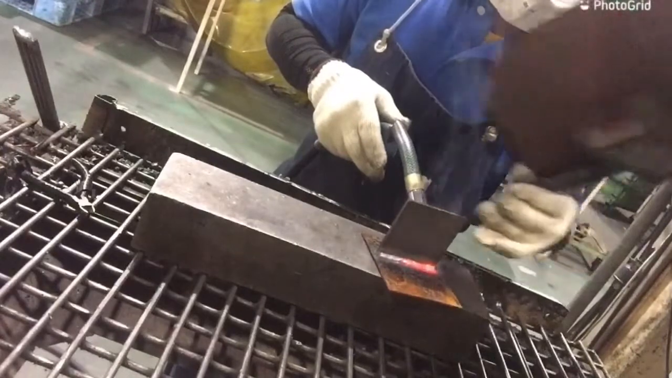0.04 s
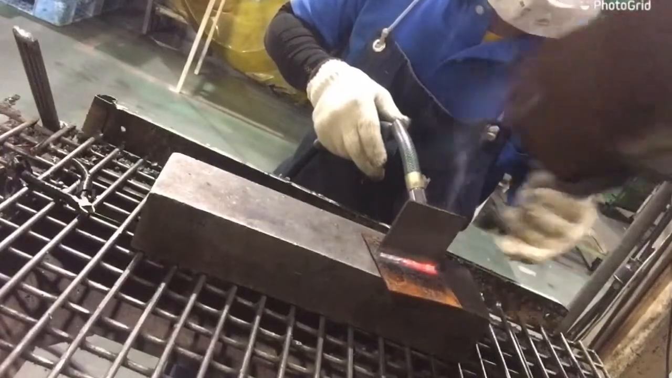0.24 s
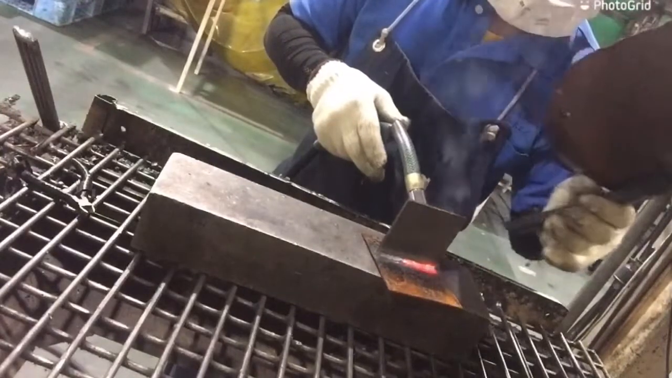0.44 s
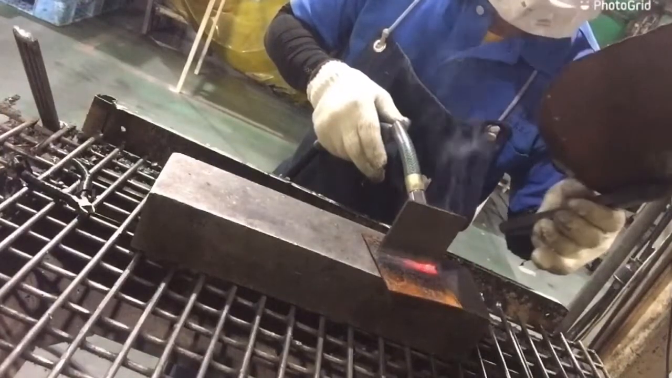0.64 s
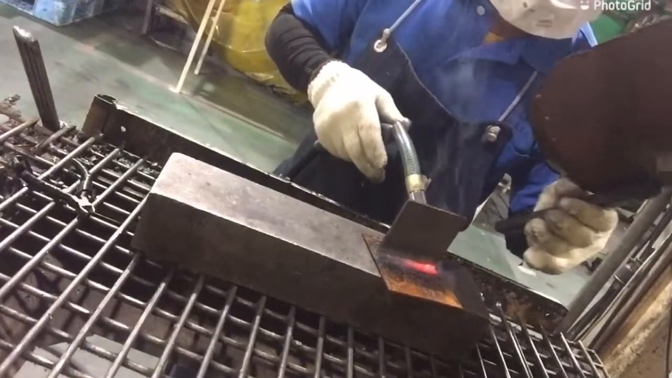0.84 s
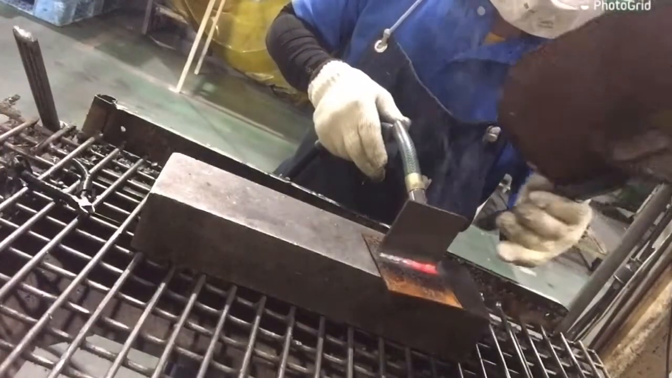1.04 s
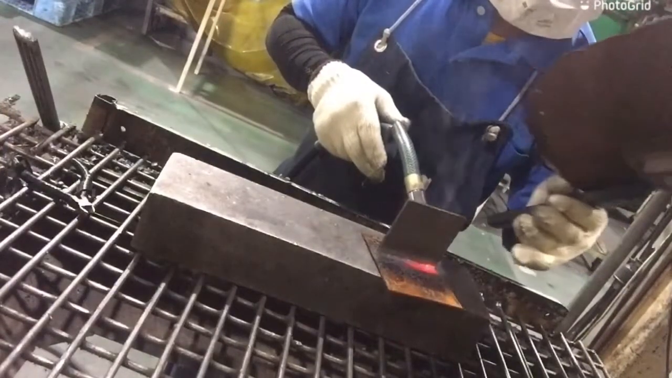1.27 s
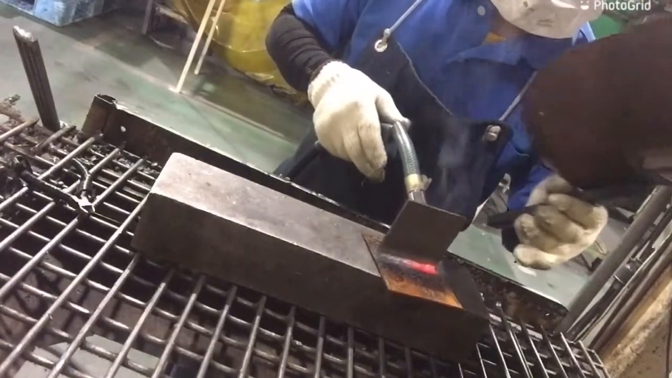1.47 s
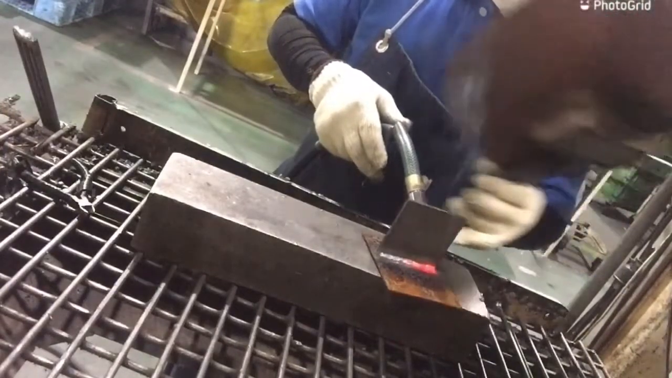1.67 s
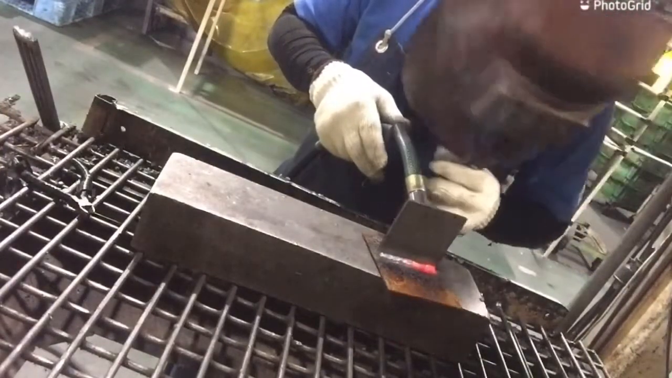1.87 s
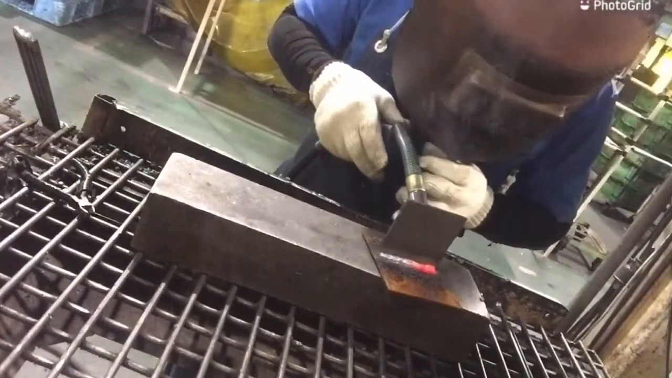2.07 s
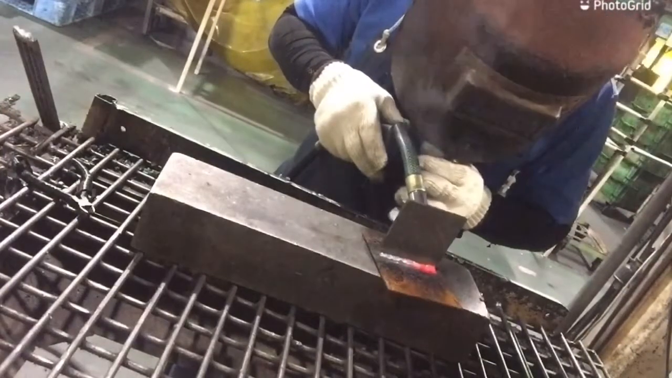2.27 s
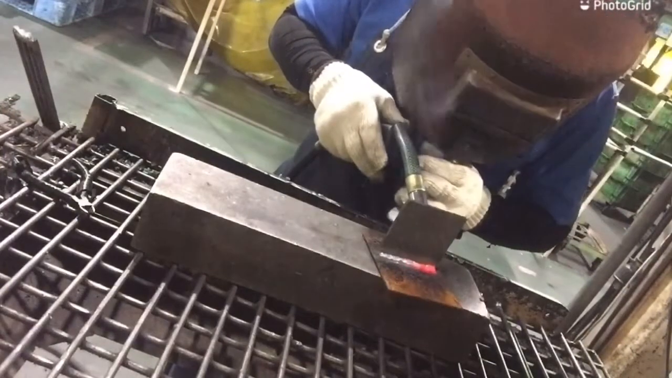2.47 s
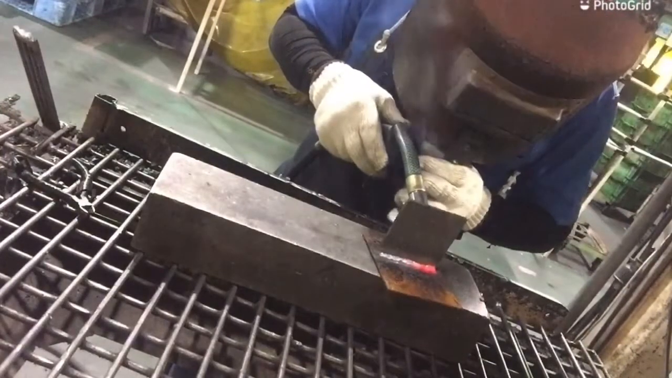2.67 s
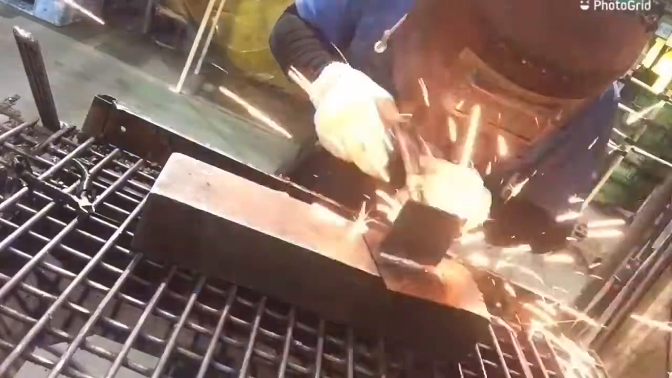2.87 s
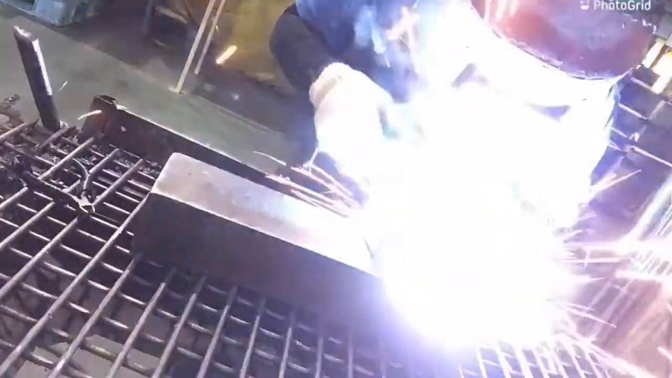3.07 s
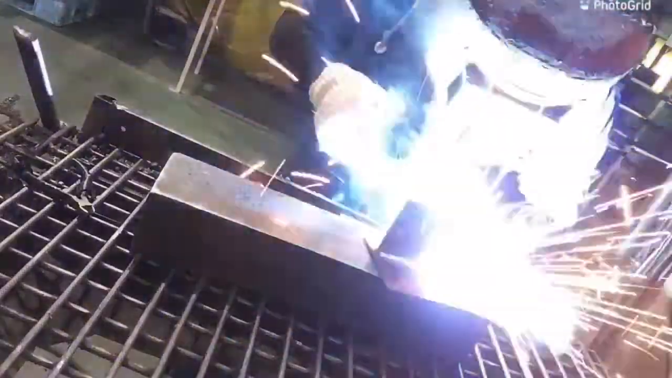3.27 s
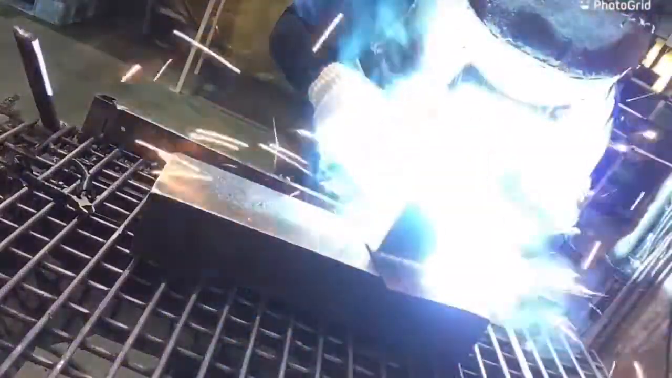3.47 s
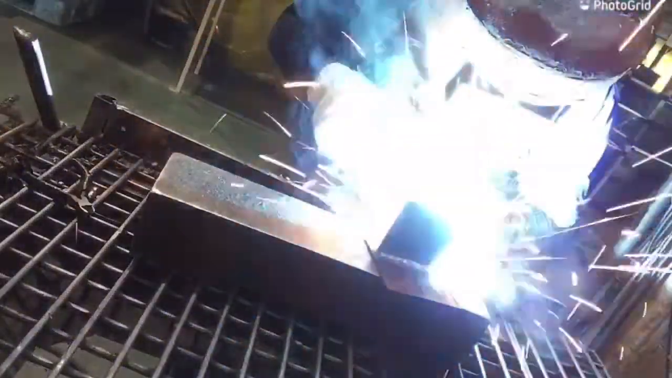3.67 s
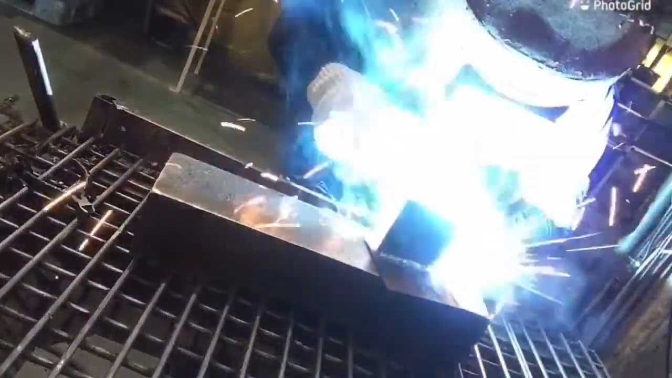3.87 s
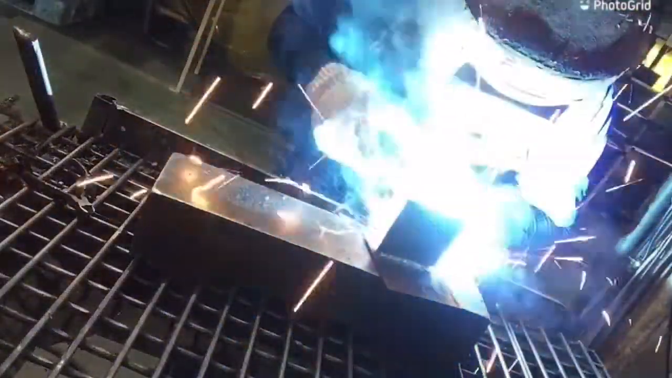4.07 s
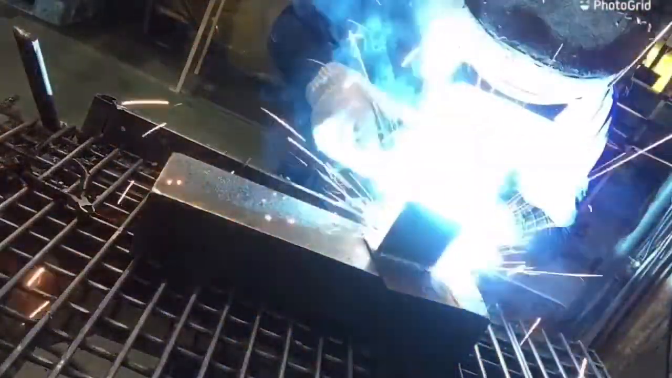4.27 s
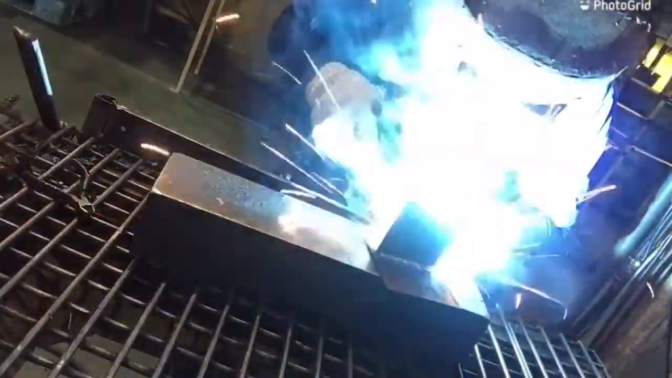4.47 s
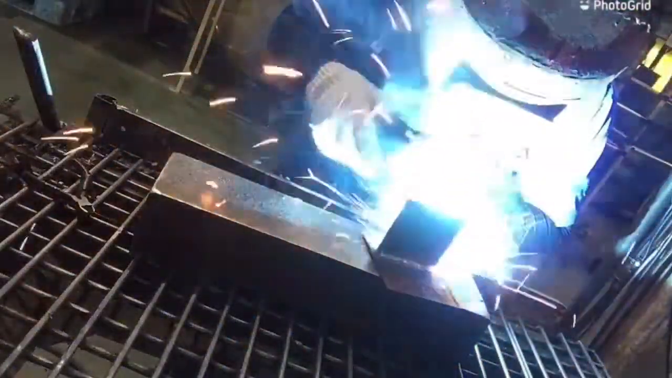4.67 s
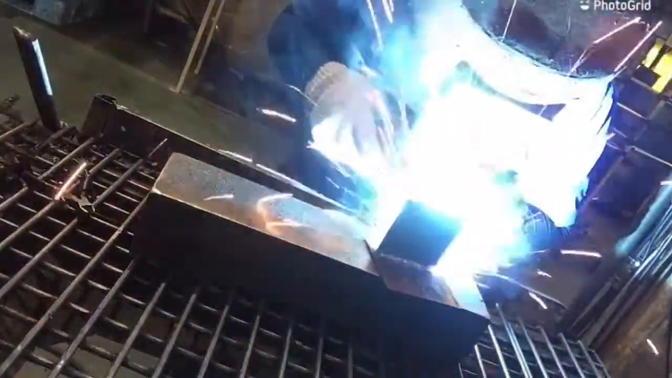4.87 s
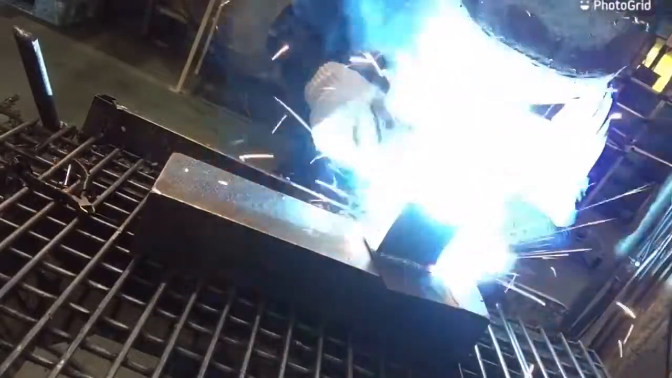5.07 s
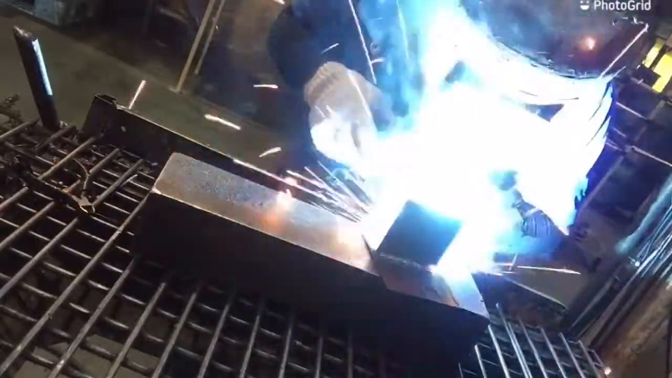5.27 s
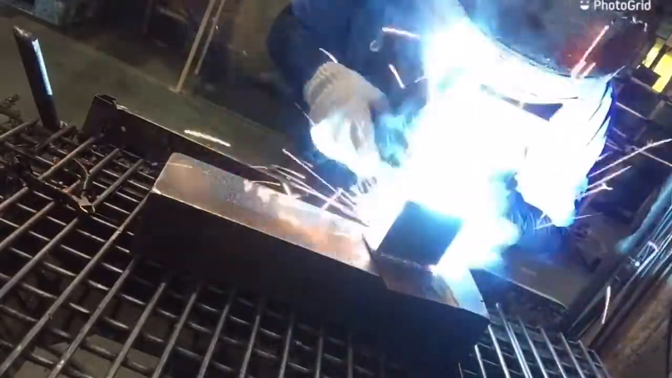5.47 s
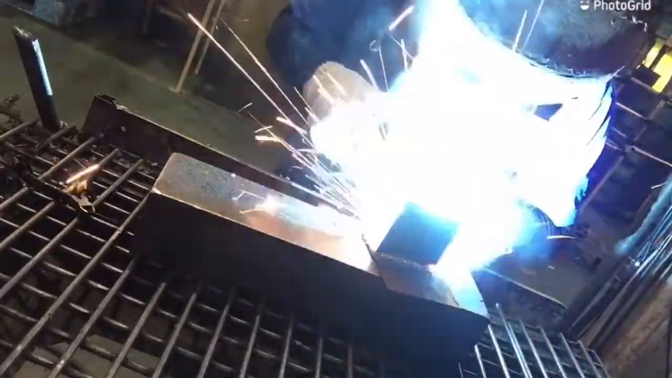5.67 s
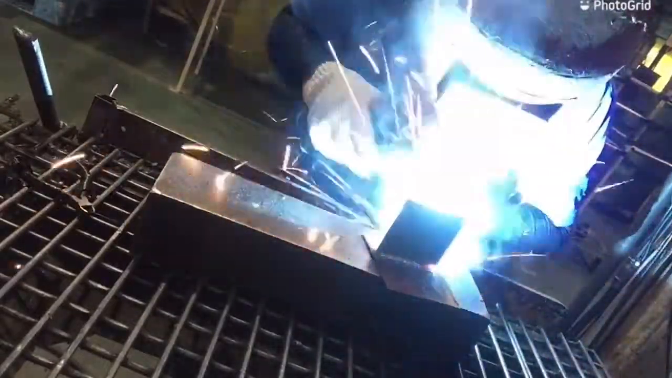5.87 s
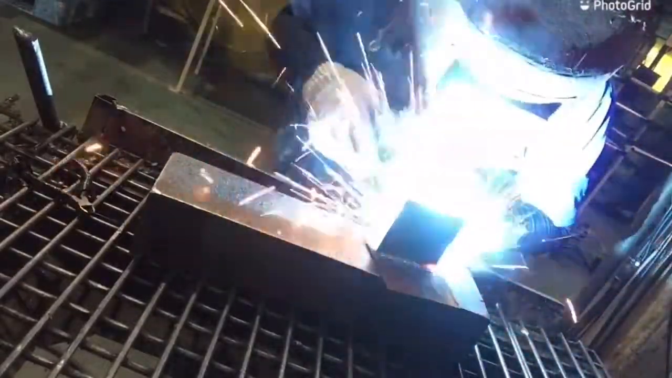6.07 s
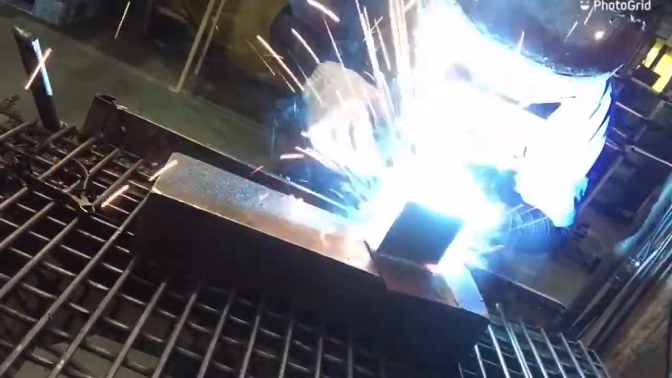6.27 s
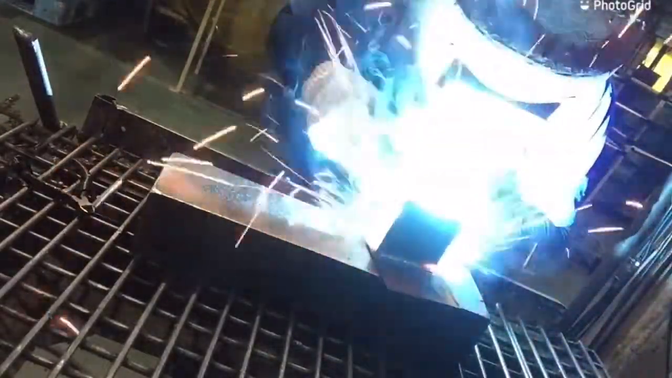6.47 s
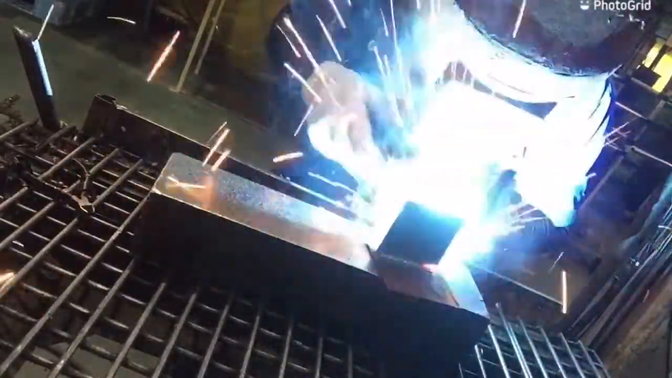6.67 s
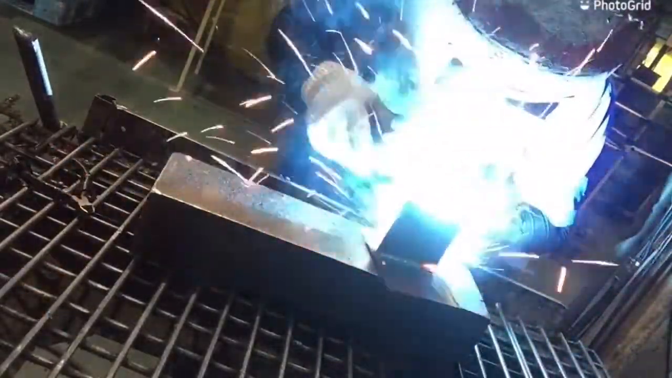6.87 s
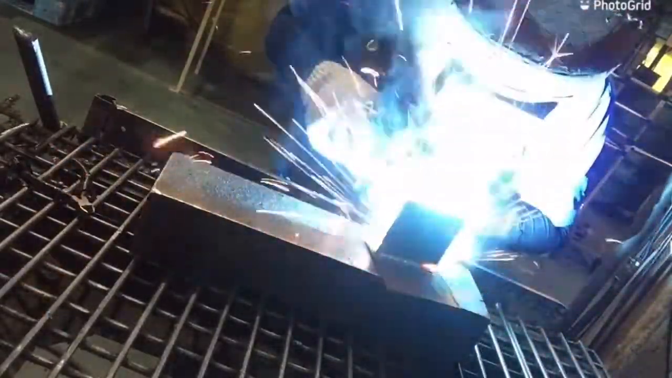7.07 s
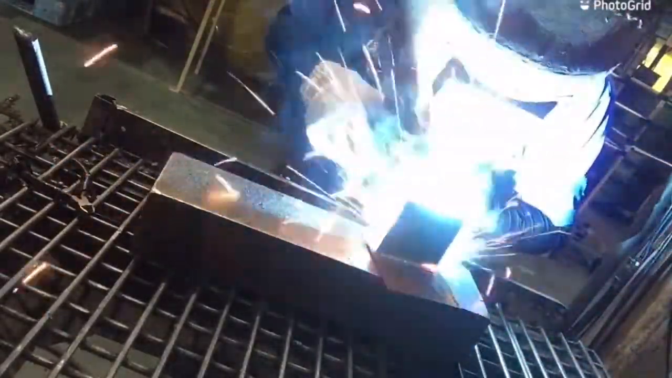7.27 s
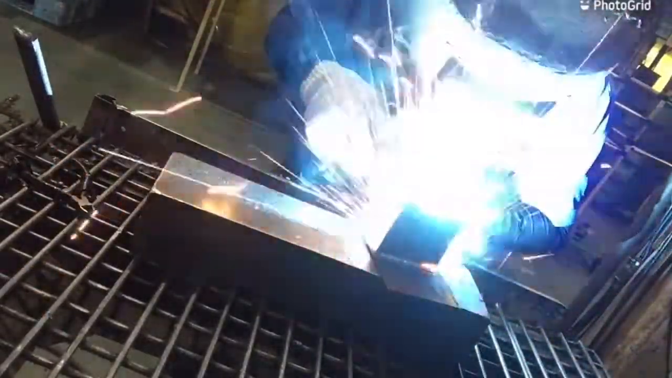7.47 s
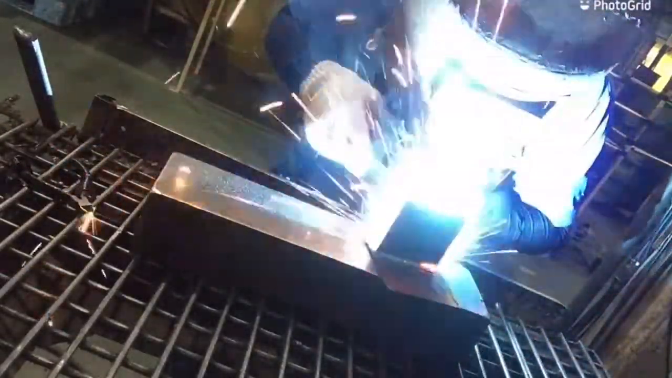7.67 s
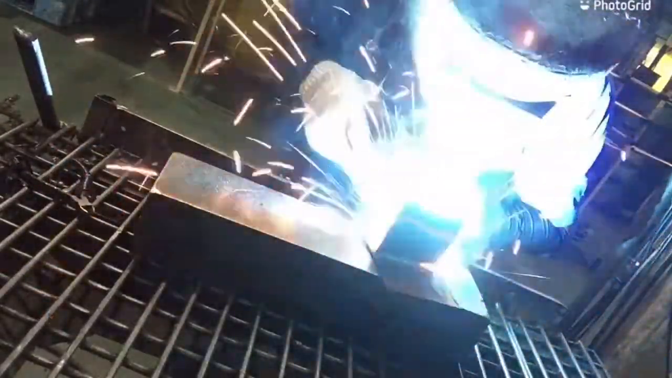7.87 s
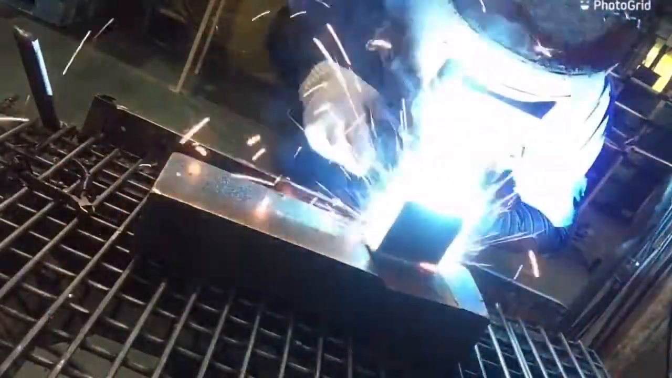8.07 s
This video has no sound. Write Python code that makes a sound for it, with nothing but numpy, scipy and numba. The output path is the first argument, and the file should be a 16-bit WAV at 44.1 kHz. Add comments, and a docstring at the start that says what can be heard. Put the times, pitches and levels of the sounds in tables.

```python
"""Tack welding in a droning workshop

Fans and motor lines drone as filtered noise and wavering sines; a wire scratches thin steel in fizzing bursts.
The arc catches with blasts, falling-pitch thumps that kick the phone's microphone, then settles into a crackle:
the wire dips into the pool roughly 55 to 115 times a second, even when slow, ragged when fast, and at times sticks.
Each re-ignition is an impulse with a spray of noise, ringing the space between plate, torch and mask."""
import sys
import numpy as np
from scipy import signal
from scipy.fft import rfft, irfft, next_fast_len
from scipy.io import wavfile
from scipy.ndimage import uniform_filter1d
from numba import njit

SR = 44100
rng = np.random.default_rng(int(sys.argv[2]) if len(sys.argv) > 2 else 0)


def persist_wave(psi):
    """Save psi, clipped to +-1, as 16-bit WAV."""
    counts = np.round(np.clip(psi, -1, 1) * 32767).astype(np.int16)
    wavfile.write(sys.argv[1], SR, np.atleast_2d(counts).T)


N = 358533
T = np.arange(N) / SR  # time axis [s]
ARC_START_S, SETTLED_S = 3.0, 3.357  # the arc catches; the wire begins to dip evenly
EVEN_RATE, RAGGED_RATE = 60, 100  # dips a second: slow dipping is even, fast dipping is ragged
ESCAPE_S = 0.011  # time in which a snap escapes from the open-sided nook
TOP_HZ = 15900  # where the phone cuts the top

# Colour of the workshop fans: (frequency [Hz], relative level [dB per Hz])
FAN_COLOUR = [(20, -40), (42, -12.5), (56, -7), (78, -6.5), (110, -5.5), (250, -5.5), (400, -8.5),
              (500, -14.5), (750, -19), (1400, -22), (3600, -25.5), (5000, -29), (6500, -28.5),
              (10400, -38.5), (11500, -36.5), (15500, -41)]
# Resonances of the ventilation ducts: (frequency [Hz], width at -6 dB [Hz], level [dB])
DUCT_MODES = [(161, 16, -39), (200, 23, -38), (323, 110, -37.5), (389, 43, -37.5)]
# Lines of motors and transformer, before they waver and sag: (frequency [Hz], level [dB])
MOTOR_LINES = [(59, -39.5), (108, -38.5), (210, -36.5), (253, -31.5), (377, -37.5), (775, -56)]
# The wire touches and sputters before the arc holds:
# (time [s], relative level [dB], rise [s], decay [s], treble share [gain])
WIRE_SPUTTERS = [(2.72, -17.5, 0.0072, 0.036, 0.053), (2.808, -2.5, 0.00057, 0.0085, 0.086),
                 (2.847, -13.5, 0.0017, 0.025, 0.34), (2.853, -8, .003, 0.0042, 1),
                 (2.9569, -3.5, 0.00036, 0.0078, 0.85), (2.9745, -9.5, 0.00054, .005, 0.96),
                 (2.966, -19, 0.022, 0.065, 0.85)]
# Resonances of the space round the arc at the start, middle and end of the seam:
# (frequency [Hz], width [Hz], relative level [dB])
NOOK_START_MODES = [(1397, 200, 0.5), (2194, 130, -3), (2360, 33, -24.5), (3040, 130, -7.5),
                    (3570, 200, -6.5), (4270, 240, -4), (4800, 140, -23), (5640, 120, 0), (6400, 97, -1.5),
                    (6690, 45, 3), (7890, 43, 0), (9100, 290, -7), (10050, 150, -1), (11200, 200, -6),
                    (11840, 170, 0.5), (12700, 320, -1), (12200, 130, -11), (13280, 82, 6), (14100, 44, -6),
                    (14700, 79, -1)]
NOOK_MIDDLE_MODES = [(1460, 130, -4), (2218, 160, -6.5), (3080, 87, -6), (3622, 85, -4.5), (4256, 49, -2),
                     (4670, 90, -3.5), (5290, 41, -6), (5720, 62, -2.5), (6307, 150, 2), (7100, 27, 0.5),
                     (8650, 130, -2.5), (9200, 76, -12), (9930, 190, -3.5), (11240, 370, -6.5),
                     (11900, 76, -12), (12100, 77, -12), (11900, 99, -3), (13400, 110, -4),
                     (13700, 77, -15), (14700, 49, -32)]
NOOK_END_MODES = [(1456, 145, -3), (2180, 260, -6.5), (2600, 169, -12.5), (3040, 88, -7), (3650, 69, -3.5),
                  (4310, 69, -8), (4690, 190, -4.5), (5750, 65, 0), (6336, 170, 2), (6960, 170, -4.5),
                  (6800, 60, -7), (8560, 170, -1), (9120, 120, -2.5), (9930, 220, -6), (11000, 300, -4),
                  (12040, 140, -2.5), (12200, 70, -15), (12900, 360, -8), (14200, 260, -7)]
# Broad colour of a snap: (frequency [Hz], relative level [dB])
SNAP_TONE = [(60, -20), (250, -9.5), (600, -0.5), (950, 1), (1220, -5.5), (1450, 0.5), (1800, 4.5),
             (2600, 5), (4000, 1), (7500, -1), (11500, 1.5), (13700, -0.5), (16000, 5)]
# The burning arc between snaps: (time [s], relative level [dB])
ARC_LEVEL = [(3.03, -21), (3.14, -26), (3.37, -37), (3.91, -29), (4.11, -24), (4.48, -21), (4.69, -21.5),
             (5.71, -19.5), (6.24, -16.5), (6.48, -26.5), (6.96, -21), (7.11, -20), (7.66, -15.5),
             (7.83, -25), (8.13, -24)]
# Pops that stand out of the crackle: (time [s], relative level [dB])
LOUD_POPS = [(3.0008, -7), (3.0115, -7), (3.0222, -3), (3.0463, -9), (3.0917, -10), (3.1128, -10),
             (3.4265, -12.5), (3.4947, -15), (3.571, -10), (3.6232, -7.5), (3.679, -10.5), (3.74, -12.5),
             (3.9427, -12.5), (4.0319, -12), (4.159, -11), (4.3341, -6), (4.3853, -13), (4.4782, -5),
             (4.4912, -4), (4.67, -7), (4.8492, -7), (4.9859, -5.5), (5.0658, -6), (5.088, -4.5),
             (5.1176, -6), (5.3023, -5), (5.6823, -6.5), (5.7856, -10), (6.14, 0.5), (6.1995, -1),
             (6.2795, -3), (6.4437, -5), (6.6352, -6), (6.6868, -6), (6.7645, -6), (6.8934, -5),
             (6.9817, -5.5), (7.2003, -7), (7.3171, -8), (7.5248, -7), (7.6091, -5.5), (7.7433, -2),
             (7.8444, -9), (7.858, -1), (7.9225, -8.5), (7.9887, -7.5)]
# Blasts of the unsteady young arc: (time [s], relative size [dB])
ARC_BLASTS = [(3.01, -15), (3.024, 4), (3.0365, 5.5), (3.112, -9), (3.1245, 8), (3.1392, 0), (3.187, 10),
              (3.2, -0.5), (3.2127, -6.5), (3.2218, 3.5), (3.2313, -14), (3.2555, 0), (3.268, 5),
              (3.282, -13), (3.296, 3), (3.312, -18), (3.347, -12), (3.495, -3.5)]
# The wire sticks in the pool and the crackle falters; once settled, a snap frees it: (start [s], end [s])
WIRE_STALLS = [(3.315, 3.346), (3.46, 3.493), (4.442, 4.464), (4.5, 4.521), (4.929, 4.945), (5.022, 5.043),
               (5.471, 5.5), (5.506, 5.523), (5.535, 5.556), (5.562, 5.576), (6.555, 6.573), (6.604, 6.622),
               (6.784, 6.801), (6.836, 6.856), (6.951, 6.97), (7.866, 7.906)]
# Pace of the short circuits: (time [s], rate [dips per second])
DIP_PACE = [(3.35, 67), (3.77, 93), (3.89, 60.7), (4.25, 97), (4.31, 80), (4.43, 91), (4.55, 66),
            (4.73, 99.6), (4.85, 67.3), (5.03, 109), (5.09, 60), (5.27, 84.6), (5.39, 70), (5.51, 100.4),
            (5.87, 63), (5.93, 100.6), (6.71, 74), (6.77, 115), (6.89, 72), (7.67, 102), (7.79, 70),
            (7.85, 109), (7.97, 53.7), (8.13, 92)]
# Ordinary snaps as the pool heats up: (time [s], relative level [dB])
POOL_HEAT = [(3.35, -14.5), (3.65, -12.5), (3.82, -17), (3.98, -12.5), (4.4, -14), (4.8, -9.5), (5.8, -10),
             (8.13, -11)]


def undb(db):
    """Decibels to gain."""
    return 10 ** (np.asarray(db) / 20)


def unit(x):
    """Scale to rms 1."""
    return x / np.sqrt(np.mean(x ** 2))


def curve(rows):
    """Join (time, value) rows by straight lines."""
    return np.interp(T, *np.transpose(rows))


def colour(points, hz):
    """Gain of a (Hz, dB) spectrum, drawn over log frequency."""
    f, db = np.transpose(points)
    return undb(np.interp(np.log(hz + 1), np.log(f), db))


def noise(gain_at):
    """Noise of rms 1 with the spectrum gain_at(Hz)."""
    size = next_fast_len(N, True)
    spectrum = rfft(rng.standard_normal(size)) * gain_at(np.fft.rfftfreq(size, 1 / SR))
    return unit(irfft(spectrum, size)[:N])


def bell(hz, centre, width):
    """Gain of one resonance, 3 dB down across its width."""
    return 1 / np.sqrt(1 + (2 * (hz - centre) / width) ** 2)


def walk(rate):
    """Smooth random wander of rms 1, with a new target `rate` times a second."""
    k = int(SR / rate)
    steps = np.repeat(rng.standard_normal(N // k + 1), k)
    return unit(uniform_filter1d(steps, k)[:N])


def lowpass(x, hz, order=2):
    """Butterworth low-pass."""
    return signal.sosfilt(signal.butter(order, hz, fs=SR, output="sos"), x)


def ring(x, response):
    """Pass a sound through an impulse response."""
    return signal.fftconvolve(x, response)[:N]


def strikes(times, sizes):
    """A train of single impulses."""
    samples = np.clip(np.asarray(times) * SR, 0, N).astype(int)
    return np.bincount(samples, sizes, N + 1)[:N]


def tail(seconds):
    """Decaying noise of energy 1."""
    t = T[:SR // 2]
    y = rng.standard_normal(len(t)) * np.exp(-t / seconds)
    return y / np.linalg.norm(y)


def workshop(air_db=-28.5, waver=0.14, wander=0.68, sag_db=-3):
    """Fan noise, rumbling ducts and wavering motor lines, which sag a little once the arc draws current."""
    air = undb(air_db) * noise(lambda hz: colour(FAN_COLOUR, hz))
    ducts = sum(undb(db) * noise(lambda hz: bell(hz, f, w) ** 2) for f, w, db in DUCT_MODES)
    lines = np.zeros(N)
    for f, db in MOTOR_LINES:
        phase = 2 * np.pi * f * T + waver * walk(13) + wander * walk(2.01)
        lines += undb(db + 2 * walk(7)) * np.sqrt(2) * np.sin(phase)
    load = np.clip((T - ARC_START_S) * 10, 0, 1)
    return air + ducts + undb(sag_db * load) * lines


def sputters():
    """Short fizzing bursts as the wire scratches the plate, each with its own share of treble."""
    fizz = rng.standard_normal(N)
    dull = lowpass(fizz, 2700, order=1)
    out = np.zeros(N)
    for start, db, rise, decay, treble in WIRE_SPUTTERS:
        age = np.maximum(T - start, 0)
        envelope = np.minimum(age / rise, 1) * np.exp(-np.maximum(age - rise, 0) / decay)
        out += undb(db) * envelope * (dull + treble * (fizz - dull))
    return out


def nook(modes, direct_db, bounce=0.42, size=4096):
    """Causal response of the space between plate, torch and mask: a direct crack and its resonances."""
    hz = np.fft.rfftfreq(size, 1 / SR)
    power = undb(direct_db) ** 2 + sum((undb(db) * bell(hz, f, w)) ** 2 for f, w, db in modes)
    # folding the cepstrum forward gives minimum phase: the energy comes as early as it can
    cepstrum = irfft(np.log(np.sqrt(power) * colour(SNAP_TONE, hz)))
    cepstrum[1:size // 2] *= 2
    cepstrum[size // 2 + 1:] = 0
    spectrum = np.exp(rfft(cepstrum))
    # all-passes: the pressure swings up, then down, and bounces once more off the steel beside it
    for lag, share in [(1, .55), (10, -bounce)]:  # lag in samples
        delay = np.exp(-2j * np.pi * hz * lag / SR)
        spectrum = spectrum * (share - delay) / (1 - share * delay)
    # the nook is open at the sides, so the sound escapes after a few passes
    response = irfft(spectrum) * np.exp(-(T[:size] / ESCAPE_S) ** 2)
    return response / np.linalg.norm(response)


def arc(room_db=-17, room_decay_s=0.047):
    """Scratches, crackle and hiss ring the nook, which changes as the torch moves; the shop answers faintly."""
    # the first scratches fall while the torch still stands clear of the seam
    near = ring(sputters(), nook(NOOK_MIDDLE_MODES, direct_db=-10))
    source = crackle()
    # place on the seam: 0 start, 1 middle, 2 end
    travel = np.interp(T, [3.9, 5.0, 6.4, 7.5], [0, 1, 1, 2])
    for place, modes in enumerate((NOOK_START_MODES, NOOK_MIDDLE_MODES, NOOK_END_MODES)):
        nearness = np.maximum(1 - np.abs(travel - place), 0)
        near = near + ring(source * nearness, nook(modes, direct_db=-14.5))
    return near + undb(room_db) * ring(lowpass(near, 6300, order=1), tail(room_decay_s))


def burning():
    """1 while the arc burns, 0 before it catches and while the wire sticks."""
    return (T > ARC_START_S) * np.prod([(T < a) | (T > b) for a, b in WIRE_STALLS], axis=0)


def crackle(snap_db=21.5, blast_snap_db=-19, touch_db=-18, short_s=0.004, short_db=-7, stall_db=-9,
            hiss_db=-7.3, flicker_db=4.0, tick_db=16, tick_spread_db=15, ticks_per_s=150,
            spatter_db=-6.5, spatter_s=0.0033):
    """The wire touches with a faint tick, the hiss drops during the short, then the arc snaps and spatters."""
    times, db = np.transpose(LOUD_POPS + [(s, blast_snap_db) for s, size in ARC_BLASTS])
    snaps = undb(snap_db) * (strikes(times, undb(db)) + dips(curve(DIP_PACE)))
    at = np.flatnonzero(snaps)
    # each short lasts 0.5 to 1.5 times short_s before its snap
    touched = T[at] - short_s * (.5 + rng.random(len(at)))
    shorted = np.cumsum(strikes(touched, np.ones(len(at))) - (snaps != 0)) > .5
    drop_db = np.minimum(short_db * shorted, stall_db * (1 - burning()))
    burn = undb(curve(ARC_LEVEL) + drop_db) * (T > ARC_START_S)
    hiss = burn * undb(hiss_db + flicker_db * walk(200)) * rng.standard_normal(N)
    # fine ticks at random moments and of random size
    tick_sizes = undb(tick_db + tick_spread_db * (rng.random(N) - .5))
    ticks = burn * (rng.random(N) < ticks_per_s / SR) * tick_sizes
    touches = strikes(touched, undb(touch_db) * snaps[at])
    pops = snaps + ticks - touches
    # each burst of the molten bridge throws off a brief spray, so no two snaps have the same colour
    spray = np.sqrt(np.abs(ring(pops ** 2, tail(spatter_s) ** 2))) * rng.standard_normal(N)
    return pops + hiss + undb(spatter_db) * spray


def plate(knock_db=-5, low_hz=580, high_hz=830, ring_s=0.0017):
    """Pops knock a short dull note from the clamped plate; squared sizes let only the hardest stand out."""
    times, db = np.transpose(LOUD_POPS)
    t = T[:SR // 20]
    note = (np.sin(2 * np.pi * low_hz * t) + np.sin(2 * np.pi * high_hz * t)) * np.exp(-t / ring_s)
    return undb(knock_db) * ring(strikes(times, undb(db) ** 2), note)


def blasts(low_hz=42, glide_hz=360, glide_s=0.00324, front_hz=900, front_s=0.00053,
           kick=1.36, kick_s=0.0011, swing=0.95, swing_s=0.019, edge_hz=4800, cut_hz=24,
           roar_db=-20, roar_hz=1300, roar_s=0.009):
    """A steep front and short rough roar kick the microphone, which swings back ever more slowly."""
    t = T[:SR // 4]
    hz = low_hz + glide_hz * np.exp(-t / glide_s) + front_hz * np.exp(-t / front_s)
    fade = kick * np.exp(-t / kick_s) + swing * np.exp(-t / swing_s)
    thump = np.cos(2 * np.pi * np.cumsum(hz) / SR) * fade
    thump = thump - lowpass(thump, cut_hz, order=1)
    times, db = np.transpose(ARC_BLASTS)
    blows = strikes(times, undb(db))
    rumble = unit(lowpass(rng.standard_normal(N), roar_hz))
    roar = undb(roar_db) * ring(blows, np.exp(-t / roar_s)) * rumble
    return lowpass(ring(blows, thump) + roar, edge_hz)


def dips(rate, jitter_s=0.0015, even_db=1.5, ragged_db=3.3, hurry_db=-3, stuck_db=-12, freeing_db=-0.5):
    """Snaps at the wire's pace, restarting at every pop and stall; hurried ones are weaker and more ragged."""
    turns = np.cumsum(rate) / SR  # dips counted so far
    freed = [SETTLED_S] + [end for start, end in WIRE_STALLS if start > SETTLED_S]
    restarts = np.sort(freed + [s for s, db in LOUD_POPS if s > SETTLED_S] + [T[-1]])
    marks = np.interp(restarts, T, turns)
    # fit a whole number of dips between restarts
    runs = [np.linspace(a, b, max(round(b - a), 1), endpoint=False)[1:] for a, b in zip(marks, marks[1:])]
    times = np.interp(np.concatenate(runs), turns, T)
    hurry = np.clip((np.interp(times, T, rate) - EVEN_RATE) / (RAGGED_RATE - EVEN_RATE), 0, 1)
    # a bigger drop of molten wire snaps louder and, in a hurry, parts later
    drop = np.sqrt(3) * rng.uniform(-1, 1, len(times))
    spread_db = even_db + (ragged_db - even_db) * hurry
    stuck = 1 - np.interp(times, T, burning())
    db = hurry_db * hurry + spread_db * drop + stuck_db * stuck
    running = strikes(times + jitter_s * hurry * drop, undb(db))
    freeing = strikes(freed, np.full(len(freed), undb(freeing_db)))
    return undb(curve(POOL_HEAT)) * (running + freeing)


def scene():
    """The shop, the blasts, the knocked plate and the arc."""
    return (workshop() + blasts() + plate() + arc())[None]


@njit
def follow(x, attack, release):
    """Envelope follower with separate rise and fall times in seconds."""
    y, e = np.empty(len(x)), 0.
    for i in range(len(x)):
        e += (x[i] - e) / (SR * (attack if x[i] > e else release))
        y[i] = e
    return y


def wind_filter(x, all_db=-7, depth_db=-17, rumble_db=-5, split_hz=900, lag_s=0.21, hold_s=0.12,
                attack_s=0.15, release_s=0.31):
    """Takes overloading bass for wind: after a moment it ducks all, lows most, and lets go slowly."""
    overload = np.abs(lowpass(x, 150)) > .45
    total = np.cumsum(overload)
    # 1 if any overload fell in the hold window that ended lag_s ago
    held = 1. * (np.interp(T - lag_s, T, total) > np.interp(T - lag_s - hold_s, T, total))
    duck = follow(held, attack_s, release_s)
    # the deepest rumble is kept down for much longer than the rest of the bass
    long_duck = follow(held, attack_s, 10.0)
    for hz, cut_db in [(split_hz, depth_db * duck), (85, rumble_db * long_duck)]:
        bass = lowpass(lowpass(x, hz)[::-1], hz)[::-1]  # both ways, so nothing shifts in time
        x = x - bass * (1 - undb(cut_db))
    return x * undb(all_db * duck)


def squeeze(x, threshold_db=-3.0, attack_s=0.0037, release_s=0.17):
    """A 2:1 compressor: a blast pushes everything down for a moment."""
    over = follow(np.abs(x), attack_s, release_s) / undb(threshold_db)
    return x / np.sqrt(np.maximum(over, 1))


def record(dry):
    """The phone filters wind, compresses the blasts, flattens the highest peaks and cuts the top."""
    x = squeeze(wind_filter(dry[0]))
    x = x / (1 + x ** 12) ** (1 / 12)
    return signal.sosfilt(signal.ellip(10, .2, 70, TOP_HZ, fs=SR, output="sos"), x)[None]


dry = scene()
out = record(dry)
persist_wave(out)
```